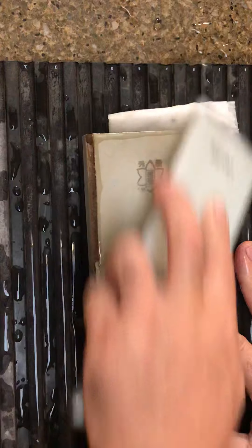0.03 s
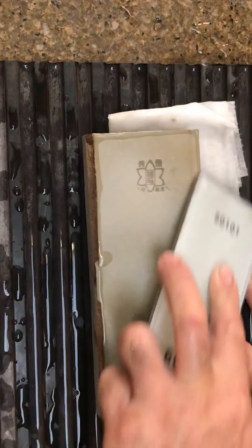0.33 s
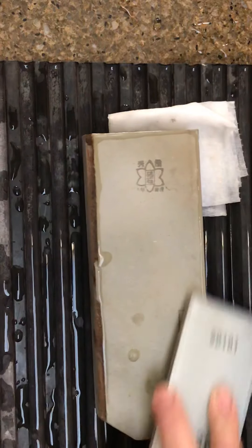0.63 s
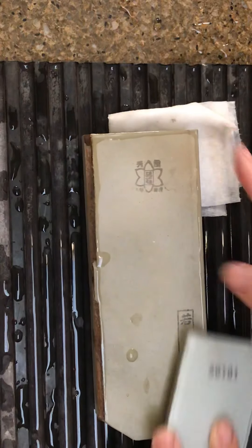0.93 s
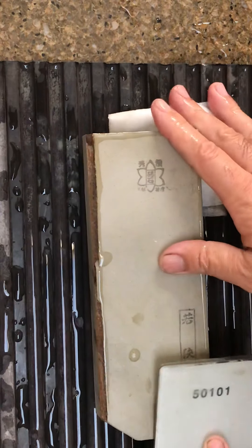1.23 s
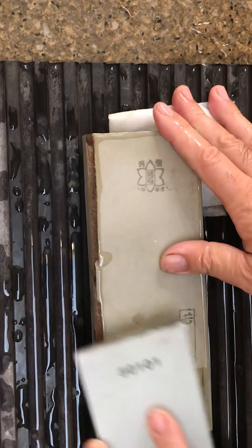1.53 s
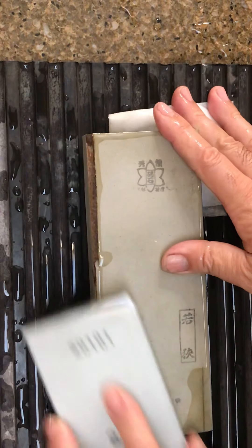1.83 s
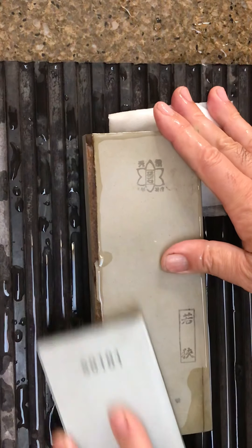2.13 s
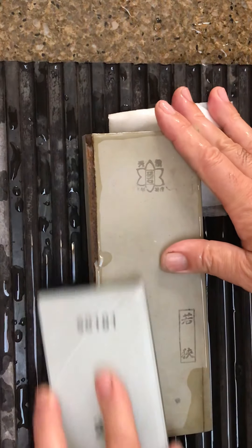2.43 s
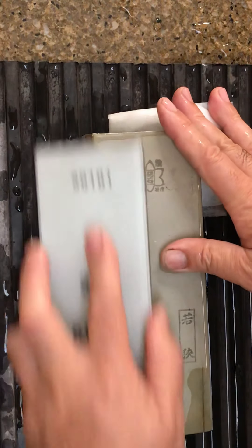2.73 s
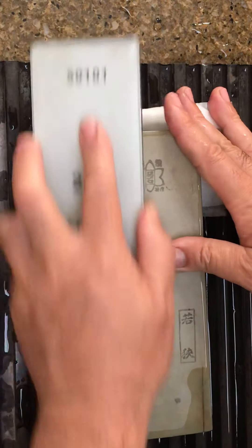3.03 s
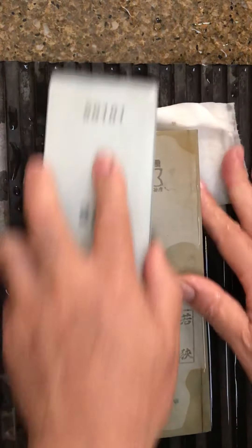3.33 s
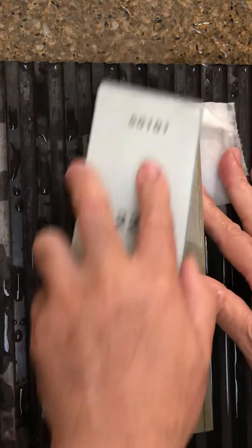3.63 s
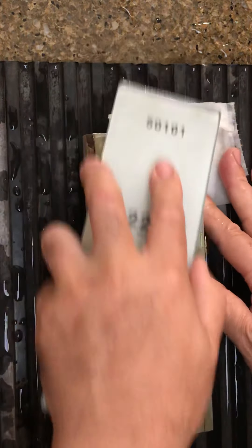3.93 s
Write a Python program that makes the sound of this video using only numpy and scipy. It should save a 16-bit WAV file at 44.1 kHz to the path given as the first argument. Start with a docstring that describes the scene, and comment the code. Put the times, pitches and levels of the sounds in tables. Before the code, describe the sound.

A flat plate scrapes back and forth over a wet whetstone in gritty strokes.

```python
"""A quiet, faintly humming room, where a flat plate is rubbed to and fro on a wet whetstone.
Grit crunches between the faces and rings both slabs. The colour shifts as the plate rides overhanging,
on its edge, on the near end, on the whole face, then overhanging again. After the first second it
slows to a creep and the water film sings thinly. Later strokes stick and slip in hoarse squeaks;
a few coarse grains crack, and the stone rocks once on its bed."""
import sys
import numpy as np
from scipy import signal
from scipy.fft import rfft, irfft, next_fast_len
from scipy.io import wavfile
from scipy.ndimage import uniform_filter1d, map_coordinates

SR = 44100
rng = np.random.default_rng(int(sys.argv[2]) if len(sys.argv) > 2 else 0)


def inscribe(sig):
    """Save sig as 16-bit PCM at rate SR to the path in sys.argv[1].

    A 1-D sig is mono; a 2-D sig holds one channel per row.
    Samples are clipped to [-1, 1] before scaling.
    """
    pcm = np.round(np.clip(np.atleast_2d(sig).T, -1, 1) * 32767)
    wavfile.write(sys.argv[1], SR, pcm.astype(np.int16))


N = 176400
TIME = np.arange(N) / SR
FFT_SIZE = next_fast_len(N + SR // 2)
FREQS = np.arange(FFT_SIZE // 2 + 1) * SR / FFT_SIZE

# The strokes: start_s, end_s, rasp_db, ring_db, hiss_db, rasp_crest_fraction, treble_crest_fraction
STROKES = [(-0.08, 0.225, -36, -40.5, -37.5, 0.65, 0.64), (0.224, 0.376, -33.5, -40.5, -36.5, 0.36, 0.42),
           (0.373, 0.606, -34, -38, -32.5, 0.42, 0.46), (0.602, 0.778, -36.5, -40, -36, 0.58, 0.39),
           (0.775, 1.004, -37.5, -44.5, -38.5, 0.3, 0.39), (0.98, 1.085, -55.5, -64, -61, 0.77, 0.67),
           (1.112, 1.247, -53, -63.5, -68, 0.88, 0.8), (1.274, 1.606, -36.5, -41, -45.5, 0.66, 0.58),
           (1.586, 1.739, -36.5, -43, -40.5, 0.51, 0.5), (1.737, 1.919, -32.5, -39, -36.5, 0.68, 0.56),
           (1.926, 2.087, -33.5, -40.5, -38.5, 0.28, 0.4), (2.088, 2.263, -33.5, -39.5, -37.5, 0.39, 0.35),
           (2.265, 2.418, -31.5, -38.5, -36.5, 0.51, 0.49), (2.418, 2.675, -31, -37, -31.5, 0.47, 0.4),
           (2.676, 2.863, -29, -37, -32, 0.61, 0.59), (2.863, 3.117, -31, -34.5, -30, 0.29, 0.32),
           (3.107, 3.292, -33.5, -38, -36.5, 0.4, 0.38), (3.291, 3.478, -35, -38.5, -34.5, 0.52, 0.5),
           (3.472, 3.628, -32.5, -36.5, -34.5, 0.57, 0.42), (3.625, 3.791, -35, -40.5, -35.9, 0.45, 0.58),
           (3.792, 3.939, -33.5, -40, -35, 0.48, 0.39), (3.937, 4.08, -32.5, -43, -35.5, 0.54, 0.56)]
# How the plate sits: start_s, seat_index (0 edge, 1 near end, 2 whole face, 3 overhanging)
SEATS = [(-1, 3), (.225, 0), (1.28, 1), (2.42, 2), (3.0, 3)]
# Tone of the contact in each seat: frequency_hz, gain_db
EDGE_EQ = [(300, -19.5), (620, -8.5), (760, -30), (900, -5.5), (1150, -5), (1400, 3), (1750, 3),
           (2090, -13.5), (2300, -1), (2900, -0.5), (4300, 4.5), (4950, -9), (6000, -7.5), (8200, -10),
           (10300, -18), (12200, -15.5), (16000, -18.5)]
NEAR_END_EQ = [(300, -12.5), (800, -19), (930, 2), (1100, 0.5), (1600, -1), (1950, -4), (2250, 1.5),
               (2720, -1.5), (2950, 6), (3400, -3.5), (4500, -4), (4950, -18.5), (6200, -2), (9800, -11.5),
               (10400, -15), (12200, -12), (16000, -13)]
FACE_EQ = [(300, -11), (800, -11.5), (1000, 0.5), (1250, 7.5), (1950, 2), (2900, 3), (3400, -7),
           (4400, -4.5), (5050, -18), (6500, -19.5), (9600, -19), (10400, -23.5), (13700, -21),
           (16000, -28)]
OVERHANG_EQ = [(300, -17.5), (480, -4), (680, 6), (1100, 5), (1600, 11), (2850, 7.5), (3300, 3), (3700, 8),
               (4300, 6.5), (5000, -0.5), (5650, -4), (6300, 5.5), (8000, -4), (10400, -8.5), (12300, -8),
               (16000, -5.5)]
# Plate resonances, heard only above 0 dB: pitch_hz, width_hz, edge_db, near_end_db, face_db, overhang_db
PLATE_MODES = [(900, 19, 5.5, 1, -6.5, 8.5), (1037, 130, -2, 4.4, 9.5, 1), (1642, 82, 1, 13.7, 6, -14.5),
               (4130, 160, 9, 13.5, 2.5, 7.5), (7230, 600, 11.5, 1.8, 10.5, 1.5)]
# The plate's strongest bending mode, shifting with the grip: time_s, pitch_hz, gain_db
PLATE_BENDING = [(0, 2430, -3), (.5, 2434, 15.5), (.65, 2290, 3.5), (1.3, 2320, 11.5), (1.8, 2340, 10.5),
                 (2.05, 2540, -9.5), (2.6, 2486, 11.5), (2.92, 2480, 15.5), (3.08, 2360, -11),
                 (4, 2300, -31)]
# Sharp modes of the whetstone: pitch_hz, width_hz, boost_db
STONE_MODES = [(3634, 51, 10), (5320, 63, 18.5), (9160, 320, 6), (11450, 110, 15)]
# How freely the stone rings under the hands: time_s, gain_db
STONE_FREEDOM = [(0, 3), (.35, -16), (.7, 5.5), (1.5, 0.5), (2.2, -2.5), (2.6, -16), (2.95, -15), (3.05, 3),
                 (3.42, -1.5), (3.6, -12), (4, -0.5)]
# A hollow note that swells on some strokes: time_s, pitch_hz, gain_db
HOLLOW_NOTE = [(0, 1500, -17), (.15, 1290, 16), (.3, 1280, -13), (.45, 1400, -60), (2.5, 1460, -18),
               (2.7, 1290, 23), (2.85, 1100, -40), (3.0, 1360, 3), (3.12, 1310, 14), (3.18, 930, 5),
               (3.24, 950, 1), (3.33, 1500, -3), (3.5, 1280, 14.5), (3.57, 900, -29), (3.65, 1740, 10),
               (3.85, 1800, 4), (4, 1600, 3)]
# Echoes from the plate's edges: delay_ms, sweep_per_stroke_ms, gain
EDGE_ECHOES = [(.55, .13, .36), (1.0, -.2, .33), (1.7, .22, .28)]
# Stick-slip squeaks: middle_s, length_s, pitch_hz, level_db
SQUEAKS = [(1.414, 0.16, 4450, -42), (1.689, 0.091, 4170, -32.5), (1.802, 0.13, 4286, -32.5),
           (2.037, 0.075, 4210, -36.5), (2.116, 0.056, 4340, -35.5), (2.214, 0.065, 4280, -38.5),
           (2.54, 0.04, 4330, -38), (2.616, 0.12, 4440, -44)]
# Coarse grains cracking: start_s, level_db
GRAIN_CRACKS = [(1.214, -46.5), (1.236, -48.5), (2.163, -33), (2.995, -54)]
# Colour of the room tone, ahead of its treble roll-off: frequency_hz, gain_db
ROOM_TONE_EQ = [(15, -45), (25, -18.5), (86, -2), (146, -12.5), (186, -6), (213, -15), (363, -5.5),
                (588, -22.5), (637, -16.5), (2070, -24), (2430, -26), (4150, -30), (4870, -50), (7090, -42),
                (15000, -59)]
# Partials of the hum: pitch_hz, level_db
HUM_PARTIALS = [(95, -61.5), (120, -59), (183, -58.5), (241, -64.5), (301, -65.5)]


def rubbing(body, rasp_top_hz=3200, hiss_from_hz=5600):
    """Low rasp, mid ring and top hiss swell with each stroke's friction, the hiss most steeply."""
    above_rasp, above_ring = (1 / (1 + (hz / (FREQS + 1)) ** 16) for hz in (rasp_top_hz, hiss_from_hz))
    bands = (1 - above_rasp, above_rasp - above_ring, above_ring)
    rasp, ring, hiss = (levelled(band_filter(body, band)) for band in bands)
    out = np.zeros(N)
    for start, end, rasp_db, ring_db, hiss_db, rasp_crest, treble_crest in STROKES:
        low_drag, high_drag = friction(start, end, rasp_crest), friction(start, end, treble_crest)
        out += from_db(rasp_db) * rasp * low_drag ** 0.84
        out += from_db(ring_db) * ring * high_drag ** 0.93
        out += from_db(hiss_db) * hiss * high_drag ** 1.385
    return out


def friction(start, end, crest, knee=0.82, creep=0.025):
    """Friction bites as the plate breaks loose and levels off at speed; a trace stays at the turns."""
    moving = (TIME >= start) & (TIME < end)
    drag = np.tanh(knee * swell(start, end, crest)) / np.tanh(knee)
    return np.maximum(drag, creep * moving)


def grit(grains_per_s=9000, spread_db=2.2, slurry_db=3.5):
    """Dense fractures of uneven size over smooth slurry, surging with judder and hand pressure."""
    sizes = from_db(spread_db * np.minimum(rng.exponential(1, N), 5)) * rng.choice([-1, 1], N)
    grains = unit_rms(sizes * (rng.random(N) < grains_per_s / SR))
    slurry = from_db(slurry_db) * rng.standard_normal(N)
    judder_db = 0.6 * drift(rate_hz=53)
    pressure_db = 2.05 * drift(rate_hz=12.3)
    return unit_rms((grains + slurry) * from_db(judder_db + pressure_db))


def edge_echoes(x, above_hz=2600, wander_ms=0.05):
    """The plate's travel sweeps short echoes, so ripples glide through the treble like a flanger."""
    travel = 0
    for k, (start, end, *_) in enumerate(STROKES):
        travel += (-1) ** k * (1 - np.cos(np.pi * progress(start, end))) / 2
    treble = signal.sosfilt(signal.butter(2, above_hz, "high", fs=SR, output="sos"), x)
    for delay_ms, sweep_ms, gain in EDGE_ECHOES:
        lag = (delay_ms + sweep_ms * travel + wander_ms * drift(rate_hz=2)) * SR / 1000
        x = x + gain * map_coordinates(treble, [np.arange(N) - lag], order=3)
    return x


def plate(force, crossfade_s=0.064):
    """Grit rings the plate: each seat has its own colour, and a bending mode glides on top."""
    starts, seats = np.transpose(SEATS)
    seat_now = seats[np.searchsorted(starts, TIME) - 1]
    out = np.zeros(N)
    for seat, contact_eq in enumerate((EDGE_EQ, NEAR_END_EQ, FACE_EQ, OVERHANG_EQ)):
        modes = mode_boosts((hz, width, boosts[seat]) for hz, width, *boosts in PLATE_MODES)
        fader = uniform_filter1d(1. * (seat_now == seat), int(crossfade_s * SR))
        out += fader * causal_filter(force, eq_curve(contact_eq) * modes)
    return out + gliding_resonance(out, PLATE_BENDING, width_hz=170)


def whetstone(drive):
    """The stone's sharp ring, choked and released by the hands."""
    freedom_db, = automation(STONE_FREEDOM)
    ring = causal_filter(drive, mode_boosts(STONE_MODES)) - drive
    return from_db(freedom_db) * ring


def hollow_note(drive):
    """A hollow, shifting note that swells on some strokes, at the start and in the later part."""
    return gliding_resonance(drive, HOLLOW_NOTE, width_hz=240)


def chatter(roughness_hz=330):
    """The plate sticks and slips in short, hoarse squeaks."""
    wobble = drift(roughness_hz) + 1j * drift(roughness_hz)
    out = np.zeros(N)
    for middle, length, hz, db in SQUEAKS:
        squeak = np.real(wobble * np.exp(2j * np.pi * hz * TIME))
        out += from_db(db) * swell(middle - length / 2, middle + length / 2, crest=0.49) * squeak
    return out


def water_whistle(start_s=1.11, end_s=1.23, pitch_hz=10640, rise_hz=453, level_db=-63):
    """A thin arching note from the water film while the plate creeps."""
    arch = swell(start_s, end_s, crest=0.89)
    hz = pitch_hz + rise_hz * arch + 110 * drift(rate_hz=400)
    return from_db(level_db) * arch * np.sin(2 * np.pi * np.cumsum(hz) / SR)


def grain_cracks(body):
    """Single coarse grains snap: tiny ticks in the colour of the slabs."""
    return levelled(body) * sum(from_db(db) * decay(start, decay_s=0.0027) for start, db in GRAIN_CRACKS)


def stone_bump(start_s=2.992, pitch_hz=130, level_db=-41):
    """The stone rocks once on its bed with a soft, low thud."""
    tone = np.sin(2 * np.pi * pitch_hz * (TIME - start_s))
    return from_db(level_db) * decay(start_s, decay_s=0.03) * tone


def room_reverb(x, level_db=-12.5, t60_s=0.082, predelay_s=0.004):
    """The room answers with a short, faint diffuse tail."""
    tail = rng.standard_normal(N) * from_db(-60 * TIME / t60_s) * (TIME > predelay_s)
    return from_db(level_db) * signal.fftconvolve(x, tail / np.linalg.norm(tail))[:N]


def room_tone(rumble_db=-52.5, rolloff_hz=1500, hiss_db=-65.5):
    """A bed of low room noise, wavering hum and faint steady hiss."""
    colour = eq_curve(ROOM_TONE_EQ) / np.hypot(1, FREQS / rolloff_hz)
    bed = from_db(rumble_db) * unit_rms(causal_filter(rng.standard_normal(N), colour))
    for hz, db in HUM_PARTIALS:
        bed += from_db(db) * np.sqrt(2) * np.sin(2 * np.pi * hz * TIME + 0.8 * drift(rate_hz=9.8))
    return bed + from_db(hiss_db) * rng.standard_normal(N)


def from_db(db):
    """Decibels to gain."""
    return 10 ** (np.asarray(db) / 20)


def unit_rms(x):
    """Scale to unit power."""
    return x / np.sqrt(np.mean(x ** 2) + 1e-20)


def levelled(x):
    """Ride the gain to hold the slow level at 1."""
    return x / np.sqrt(uniform_filter1d(x ** 2, size=4000) + 1e-12)


def progress(start, end):
    """A ramp from 0 at the start to 1 at the end."""
    return np.clip((TIME - start) / (end - start), 0, 1)


def swell(start, end, crest):
    """An arch from rest to 1 and back, peaking the crest fraction of the way through."""
    done, crest = progress(start, end), np.clip(crest, .1, .9)
    rise, fall = done * (1 - crest), crest * (1 - done)
    return np.abs(np.sin(np.pi * rise / (rise + fall)))


def decay(start, decay_s):
    """A hard attack and an exponential tail."""
    return (TIME >= start) * np.exp(-np.maximum(TIME - start, 0) / decay_s)


def drift(rate_hz):
    """Smooth random modulation of unit power."""
    return unit_rms(band_filter(rng.standard_normal(N), 1 / (1 + (FREQS / rate_hz) ** 2)))


def automation(rows):
    """Timed breakpoints joined into one curve per column."""
    times, *columns = np.transpose(rows)
    return [np.interp(TIME, times, column) for column in columns]


def eq_curve(points):
    """Gain at every frequency, drawn through the EQ points."""
    hz, db = np.transpose(points)
    return from_db(np.interp(np.log(FREQS + 1), np.log(hz), db))


def mode_boosts(modes):
    """A flat response with each resonance's power added on top."""
    power = 1
    for hz, width_hz, db in modes:
        detuning = (FREQS ** 2 - hz ** 2) / (width_hz * (FREQS + 1))
        power += max(from_db(db) ** 2 - 1, 0) / (1 + detuning ** 2)
    return np.sqrt(power)


def band_filter(x, gain):
    """Zero-phase filter with the given gains."""
    return irfft(rfft(x, FFT_SIZE) * gain, FFT_SIZE)[:N]


def causal_filter(x, gain):
    """Minimum-phase filter: resonances ring only after the hit."""
    cepstrum = irfft(np.log(gain + 1e-6), FFT_SIZE)
    cepstrum[1:FFT_SIZE // 2] *= 2
    cepstrum[FFT_SIZE // 2 + 1:] = 0
    return irfft(rfft(x, FFT_SIZE) * np.exp(rfft(cepstrum)), FFT_SIZE)[:N]


def gliding_resonance(x, breakpoints, width_hz):
    """A resonance with automated pitch and gain."""
    hz, db = automation(breakpoints)
    carrier = np.exp(2j * np.pi * np.cumsum(hz) / SR)
    pole = np.exp(-np.pi * width_hz / SR)
    return from_db(db) * 2 * np.real(carrier * signal.lfilter([1 - pole], [1, -pole], x / carrier))


def scene():
    """Grit drives plate, stone and hollow note; the close sounds sit in the room, in mono."""
    plate_ring = plate(edge_echoes(grit()))
    body = plate_ring + whetstone(plate_ring) + hollow_note(plate_ring)
    close = rubbing(body) + chatter() + water_whistle() + grain_cracks(body) + stone_bump()
    return (close + room_reverb(close) + room_tone())[None]


def record(dry, low_cut_hz=32, high_cut_hz=15870):
    """The deepest bass is rolled off and the top is cut steeply."""
    dry = signal.sosfilt(signal.butter(2, low_cut_hz, "high", fs=SR, output="sos"), dry)
    return signal.sosfiltfilt(signal.ellip(12, .05, 60, high_cut_hz, fs=SR, output="sos"), dry)


dry = scene()
out = record(dry)
inscribe(out)
```